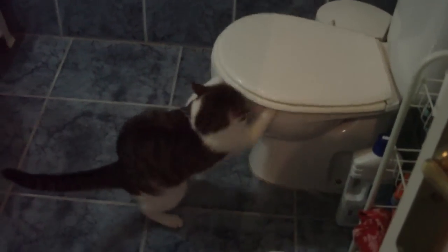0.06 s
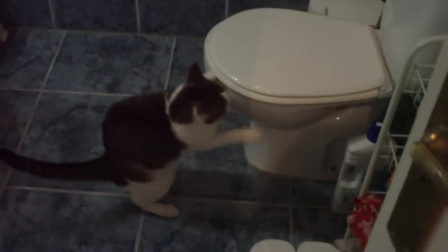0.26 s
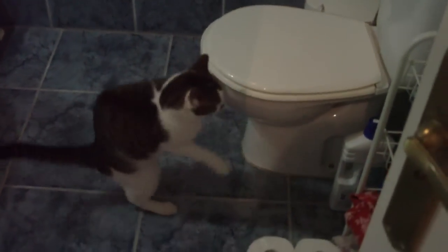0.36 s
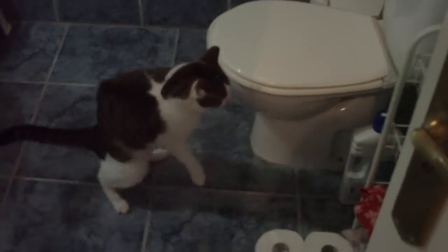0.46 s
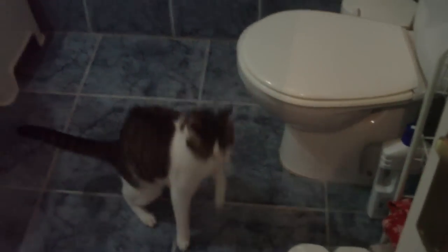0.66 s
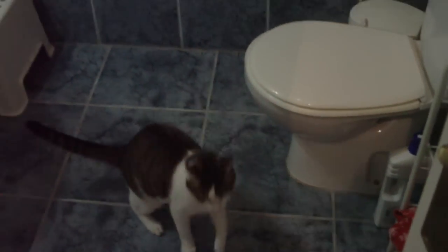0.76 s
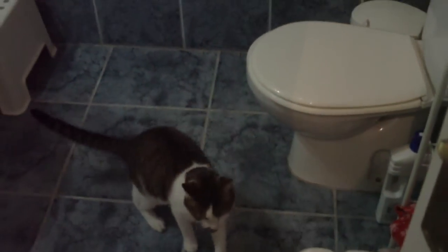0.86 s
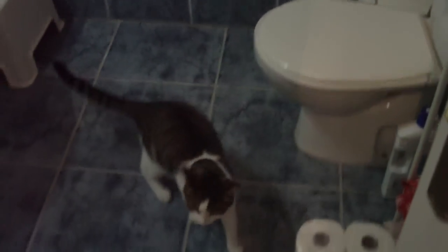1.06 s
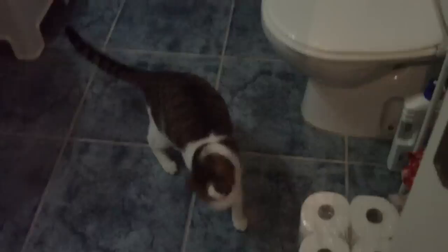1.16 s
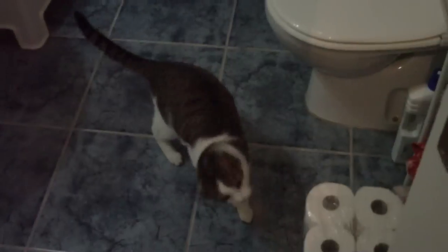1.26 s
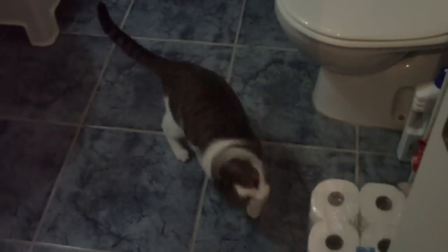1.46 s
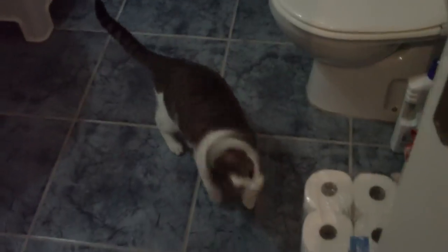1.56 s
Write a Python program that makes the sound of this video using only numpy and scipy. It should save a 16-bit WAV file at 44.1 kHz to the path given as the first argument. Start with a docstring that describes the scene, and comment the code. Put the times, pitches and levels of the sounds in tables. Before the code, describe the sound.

Close to the microphone in a small tiled bathroom, a toilet lid clatters and bangs shut, making the bowl ring and the room boom. Then a cat's paws tap softly, with faint electronic chatter and hiss throughout.

```python
"""A plastic toilet lid, heard close by in a small tiled bathroom as a cat pulls its head from under it.
The lid rattles, knocks twice and falls shut with a bang; each blow cracks, sets the bowl ringing and
makes the room boom. Soft paw taps on the floor follow. The one microphone is a camera's, whose
electronics add a thin whine and a chatter at the frame rate, over faint hiss and a low rumble."""
import sys
import numpy as np
from scipy import signal
from scipy.fft import rfft, irfft, next_fast_len
from scipy.io import wavfile
from scipy.ndimage import map_coordinates

SR = 44100
rng = np.random.default_rng(int(sys.argv[2]) if len(sys.argv) > 2 else 0)


def dump(signal):
    """Clip the signal to [-1, 1] and save it as 16-bit WAV at the path in sys.argv[1]."""
    limited = np.clip(np.atleast_2d(signal).T, -1, 1)
    pcm = np.round(limited * 32767).astype(np.int16)
    wavfile.write(sys.argv[1], SR, pcm)


N = 70560

# Blows of the lid: start_s, level_db, direct_db, boom_db, treble_db, rise_s
# (direct, boom and treble are relative to the level)
LID_BLOWS = [(.017, -41.5, 5.5, 3, 1, 0.0014), (.0298, -35, 3.5, -6, -0.5, 0.0025),
             (.0578, -38, -1, -0.5, -6.5, 0.0035), (.1795, -42.5, 12, 4, -2.5, 0.0023),
             (.2015, -20.5, -19, -2.5, 1, 0.0018), (.2955, -27, 11, -5.5, 4, 0.0025),
             (.536, -22, -2.5, -8.5, -3, .004), (.5415, -16, 5.5, -9, 1, 0.0018),
             (.573, -29.5, 5, -5, -11.5, 0.0027)]
# Paw taps on the floor: start_s, level_db, direct_db, boom_db, treble_db, rise_s
PAW_TAPS = [(1.317, -71.5, 10.5, 3, 13, .002), (1.4105, -62.5, 3, 11, 4, 0.0017),
            (1.4653, -58, 3, 6.5, -11.5, 0.0044), (1.5172, -58, 8.5, 4, -7, .002)]
# Short ring near 2 kHz heard with every blow and tap: pitch_hz, level_db, t60_s
CONTACT_RING_MODES = [(1937, -3, 0.029), (2144, -4.5, 0.052), (2318, 2.5, 0.043), (2460, -3.5, 0.046),
                      (2750, -10, .03), (3230, -1.5, 0.019)]
# Lasting ring of the bowl and tiles: pitch_hz, level_db, t60_s
BOWL_MODES = [(639.6, -9.5, .55), (739, -5.5, 0.62), (1099, -11.5, 0.39), (1534, -7.5, 0.46),
              (1952, 0, 0.42), (2130, -3.5, 0.43), (2320, -9.5, 0.57), (2438, -5.5, 0.39),
              (2620, 0.5, 0.28), (2932, -4.5, 0.37), (3240, -7.5, .43), (4800, -13, .45)]
# Standing waves of the room: pitch_hz, level_db, t60_s
ROOM_MODES = [(67.3, -13.5, 1.0), (94.8, -9, 0.75), (116.06, -1, 0.67), (131.2, -4, 0.69), (162, -5, .7),
              (179.1, -2.5, 0.99), (201.5, -3, 0.83), (237.8, -12.5, 0.73), (278.5, -13, 0.33),
              (355.2, -9, 0.38)]
# Colour of a blow among the tiles: frequency_hz, level_db
BLOW_SPECTRUM = [(30, -17), (120, -4), (300, -8.5), (480, -13.5), (700, -6), (1000, -6), (1400, -6),
                 (2000, 1.5), (2450, -0.5), (3000, -3), (3800, -6.5), (5200, -7), (6200, -9.5),
                 (7700, -6.5), (9000, -17), (10500, -22.5), (12500, -40), (15500, -50)]
# Decay of the room's echoes: frequency_hz, t60_s
ROOM_DECAY = [(100, .8), (400, 0.74), (1000, 0.57), (2200, .52), (5000, .52), (8000, 0.45), (13000, 0.3)]
# Shelf that takes a blow's treble_db: frequency_hz, share
TREBLE_SHELF = [(2500, 0), (5000, 1)]
# Steady hiss: frequency_hz, level_db
HISS_SPECTRUM = [(250, 0.5), (600, -2.5), (1500, -9.5), (3500, -10.5), (5000, -2.5), (7500, 0.5),
                 (9000, -9), (12000, -15), (15500, -19.5)]
# Low rumble: frequency_hz, level_db
RUMBLE_SPECTRUM = [(20, 5.5), (40, -2.5), (65, 2), (100, -7), (180, -7.5), (300, -25), (800, -46)]
# Swell of the rumble: time_s, level_db
RUMBLE_SWELL = [(0, -57), (.9, -56.5), (1.3, -55), (1.45, -51.5), (1.55, -48.5), (1.6, -45.5)]
# Whine of the camera: pitch_hz, level_db
WHINE_TONES = [(7824, -65), (7885, -57.5), (7945, -66.5), (8005, -74)]
# Higher, rougher bursts in the camera's chatter: start_s, length_s, pitch_hz, level_db
CHATTER_BURSTS = [(0.058, .028, 6800, -45.5), (0.446, .04, 6800, -48.5), (0.766, 0.025, 6300, -49),
                  (0.868, 0.023, 6340, -48.5), (0.939, 0.033, 6820, -47.5), (1.06, .032, 7000, -47),
                  (1.167, 0.024, 6200, -49.5), (1.265, .026, 6300, -50.5), (1.339, 0.049, 6870, -47),
                  (1.559, 0.032, 6900, -48)]


def background():
    """Faint hiss at the microphone, and a low rumble that swells at the end."""
    hiss_db = -56
    rumble_db = np.interp(np.arange(N) / SR, *np.transpose(RUMBLE_SWELL))
    return amp(hiss_db) * noise(HISS_SPECTRUM) + amp(rumble_db) * noise(RUMBLE_SPECTRUM)


def camera_whine():
    """The camera's electronics hold a cluster of thin, steady tones."""
    t = np.arange(N) / SR
    return sum(np.sqrt(2) * amp(db) * np.sin(2 * np.pi * (hz * t + rng.random()))
               for hz, db in WHINE_TONES)


def chirp(length_s, hz, sag_hz, wander_hz, wander_rate):
    """A short unsteady tone that sags by sag_hz to reach hz in the middle."""
    t = np.arange(int(length_s * SR)) / SR
    wander = map_coordinates(rng.standard_normal(256), [t * wander_rate], mode="mirror")
    pitch = hz + sag_hz * (2 * t / length_s - 1) ** 2 + wander_hz * wander
    return np.sqrt(2) * np.sin(2 * np.pi * np.cumsum(pitch) / SR) * signal.windows.tukey(len(t), .5)


def camera_chatter(frame_hz=30, first_s=0.001006, chirp_s=0.026, chirp_db=-49):
    """The electronics chirp once a frame, now and then giving way to a higher burst."""
    out = np.zeros(N)
    for start_s in first_s + np.arange(int(N / SR * frame_hz)) / frame_hz:
        gain = amp(chirp_db + rng.normal())
        tone = chirp(chirp_s, hz=5397, sag_hz=337, wander_hz=170, wander_rate=820)
        middle_s = start_s + chirp_s / 2
        if not any(start < middle_s < start + length for start, length, _, _ in CHATTER_BURSTS):
            add(out, start_s, gain * tone)
    for start_s, length_s, hz, db in CHATTER_BURSTS:
        add(out, start_s, amp(db) * chirp(length_s, hz, sag_hz=0, wander_hz=336, wander_rate=1500))
    return out


def ring(modes, scatter_db):
    """Struck modes die away as damped sines, with random phases and scattered strengths."""
    t = np.arange(N) / SR
    out = np.zeros(N)
    for hz, db, t60_s in modes:
        envelope = amp(db + scatter_db * rng.normal() - 60 * t / t60_s)
        out += envelope * np.sin(2 * np.pi * (hz * t + rng.random()))
    return out


def contact(crack_db=2, crack_t60_s=0.027):
    """The direct sound of every blow and tap: a short ring near 2 kHz and a crack of noise."""
    t = np.arange(N) / SR
    short_ring = ring(CONTACT_RING_MODES, scatter_db=0)
    crack = amp(crack_db - 60 * t / crack_t60_s) * noise(BLOW_SPECTRUM)
    return short_ring + crack


def tile_echoes():
    """Dense echoes off the tiles; the treble dies first."""
    hz, t, spectrum = signal.stft(noise(BLOW_SPECTRUM), SR, nperseg=256)
    decay = amp(-60 * t / along(ROOM_DECAY, hz)[:, None])
    return signal.istft(spectrum * decay, SR, nperseg=256)[1][:N]


def strikes(blows, boom_rise_s, bowl_db=-9.5, room_db=-5):
    """Each blow of lid or paw echoes off the tiles, rings the bowl and builds up the room's boom."""
    out, t = np.zeros(N), np.arange(N) / SR
    for start_s, level_db, direct_db, boom_db, treble_db, rise_s in blows:
        body = amp(direct_db) * contact() + tile_echoes()
        body += amp(bowl_db) * ring(BOWL_MODES, scatter_db=3.5)
        body = filtered(body, lambda hz: amp(treble_db * along(TREBLE_SHELF, hz)))
        body *= 1 - np.exp(-t / rise_s)
        boom = amp(room_db + boom_db) * ring(ROOM_MODES, scatter_db=2.5)
        boom *= 1 - np.exp(-t / boom_rise_s)
        add(out, start_s, amp(level_db) * (body + boom))
    return out


def scene():
    """The bathroom from one microphone, alike in both channels."""
    lid = strikes(LID_BLOWS, boom_rise_s=0.0087)
    paws = strikes(PAW_TAPS, boom_rise_s=.012)
    mono = lid + paws + camera_chatter() + camera_whine() + background()
    return np.array([mono, mono])


def record(dry):
    """The camera keeps nothing above its band limit."""
    top_hz = 15400
    return np.array([filtered(channel, lambda hz: hz < top_hz) for channel in dry])


def amp(db):
    """Decibels to gain."""
    return 10 ** (np.asarray(db) / 20)


def along(points, hz):
    """Read (frequency_hz, value) points at hz, on a log frequency axis."""
    frequencies, values = np.transpose(points)
    return np.interp(np.log(hz + 1), np.log(frequencies + 1), values)


def filtered(x, response):
    """Filter x by a gain given as a function of frequency."""
    size = next_fast_len(N + 8192)
    return irfft(rfft(x, size) * response(np.fft.rfftfreq(size, 1 / SR)), size)[:N]


def noise(spectrum):
    """Coloured noise of rms 1."""
    x = filtered(rng.standard_normal(N), lambda hz: amp(along(spectrum, hz)))
    return x / np.sqrt(np.mean(x ** 2) + 1e-20)


def add(out, start_s, x):
    """Mix x into out from start_s."""
    i = max(round(start_s * SR), 0)
    out[i:i + len(x)] += x[:max(N - i, 0)]


dry = scene()
out = record(dry)
dump(out)
```